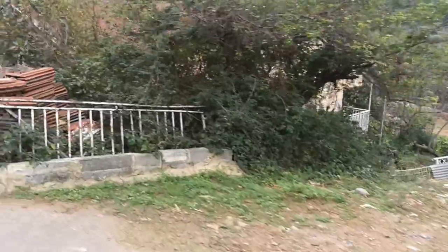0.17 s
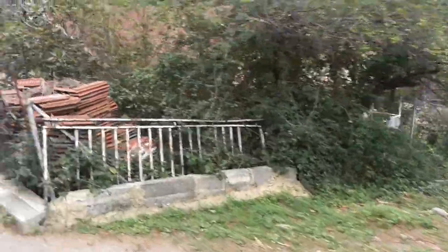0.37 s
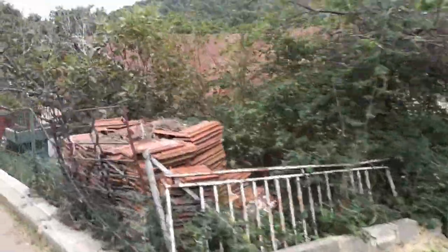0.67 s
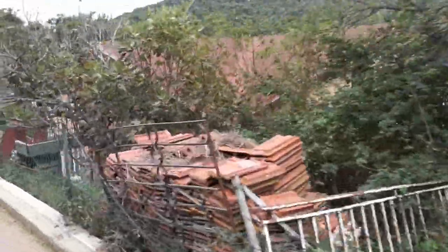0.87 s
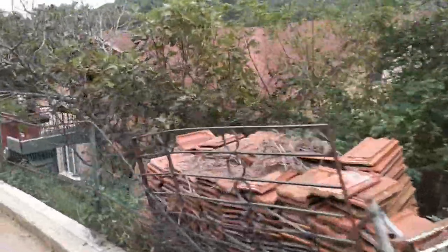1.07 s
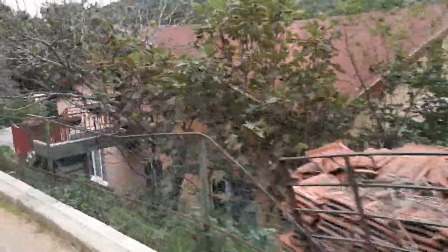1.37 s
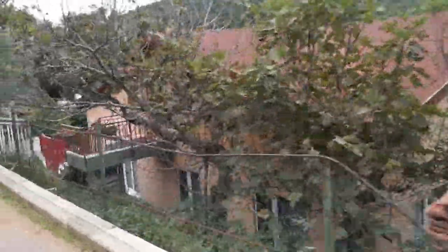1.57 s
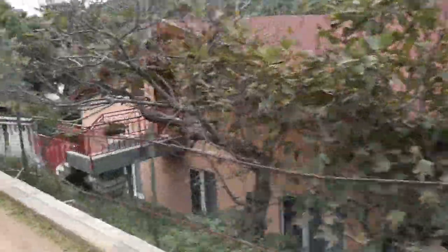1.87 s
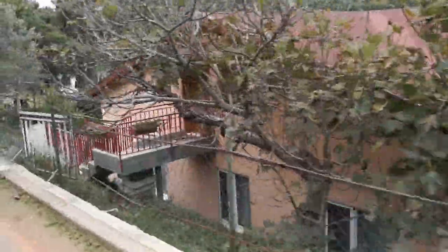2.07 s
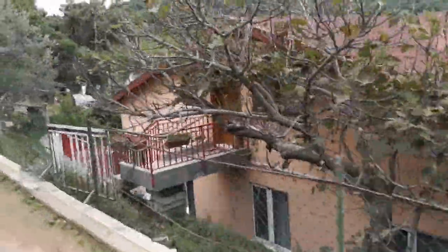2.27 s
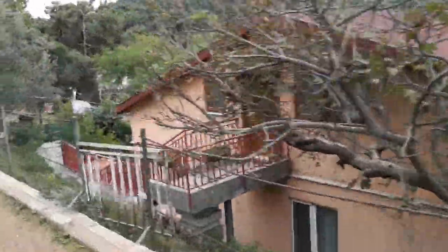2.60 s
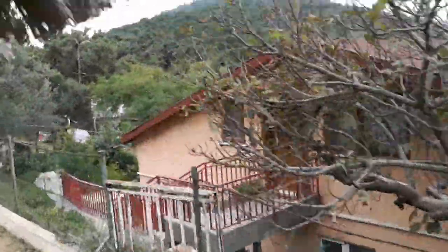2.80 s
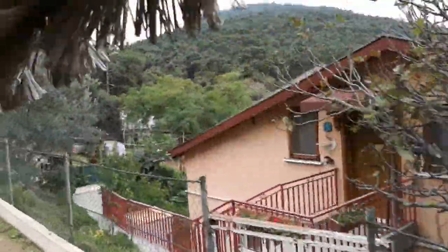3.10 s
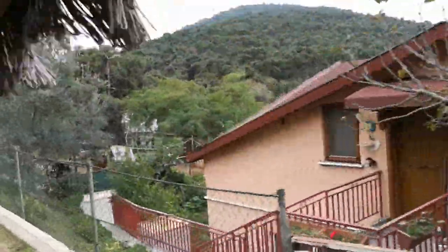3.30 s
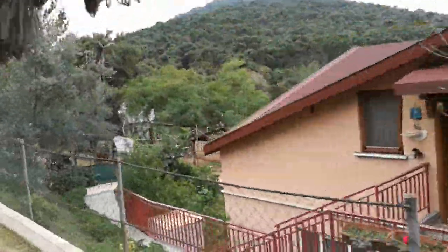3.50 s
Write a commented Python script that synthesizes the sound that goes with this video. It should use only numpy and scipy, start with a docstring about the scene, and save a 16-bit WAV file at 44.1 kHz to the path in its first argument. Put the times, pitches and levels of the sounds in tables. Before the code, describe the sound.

A horse-drawn cart rumbles along with irregular hoof knocks, wheel thuds and wind buffeting.

```python
"""Gusts buffet the microphone on board a horse-drawn cart trotting along a country lane.
Hooves and woodwork knock as hollow bodies ring, and jolts of the wheels give low thuds.
Shoes and fittings clack, iron scrapes over grit and the ironwork gives short squeaks.
Underneath, the wheels roll with a fluttering noise and a crackle of grit."""
import sys
import numpy as np
from scipy import signal
from scipy.fft import rfft, irfft
from scipy.io import wavfile
from scipy.ndimage import uniform_filter1d

SR = 44100
rng = np.random.default_rng(int(sys.argv[2]) if len(sys.argv) > 2 else 0)


def master(y):
    """Save y as 16-bit WAV."""
    cut = np.clip(np.atleast_2d(y).T, -1, 1)
    pcm = np.round(cut * 32767)  # scale
    wavfile.write(sys.argv[1], SR, pcm.astype(np.int16))


N = 160965
HZ = np.fft.rfftfreq(N, 1 / SR)
LEFT_LAG_S, HIT_SAMPLES = 0.000598, 8000


def amp(db):
    return 10 ** (np.asarray(db) / 20)


def pan(left_db):
    """Stereo gains, left_db louder on the left."""
    return amp([[left_db / 2], [-left_db / 2]])


def unit_rms(x):
    return x / np.sqrt(np.mean(x ** 2) + 1e-20)


def over_hz(points):
    hz, value = np.transpose(points)
    return np.interp(np.log(HZ + 1), np.log(hz + 1), value)


def over_time(points):
    return np.interp(np.arange(N) / SR, *np.transpose(points))


def colour(x, tone):
    """Filter by a spectrum; white noise keeps its rms."""
    return irfft(rfft(x) * unit_rms(amp(over_hz(tone))), N)


def resonate(x, hz, width_hz):
    return signal.lfilter(*signal.iirpeak(min(hz, 20000), hz / width_hz, SR), x)


def add(mix, start_s, sound):
    part = mix[:, round(start_s * SR):][:, :sound.shape[1]]
    part += sound[:, :part.shape[1]]


def bursts(per_s, spread_db, length_s):
    """Envelope of short bursts, random in time and size."""
    size = amp(spread_db * np.minimum(rng.exponential(1, N), 4)) * (rng.random(N) < per_s / SR)
    age = np.arange(2000) / SR / length_s
    return unit_rms(signal.oaconvolve(size, age * np.exp(-2 * age))[:N])


def impact(rise_s, t60_s, tail_db, tail_t60_s):
    """Envelope of a hit: quick rise, short crack, softer tail."""
    t = np.arange(HIT_SAMPLES) / SR
    return np.minimum(t / rise_s, 1) * (amp(-60 * t / t60_s) + amp(tail_db - 60 * t / tail_t60_s))


def mottle(x, spread_db):
    """Random louder and softer patches over time and frequency."""
    spectra = signal.stft(x, nperseg=512)[2]
    patches = uniform_filter1d(rng.standard_normal(spectra.shape[1:]), size=6, axis=0)
    patches = uniform_filter1d(patches, size=5, axis=1)
    return signal.istft(spectra * amp(spread_db * unit_rms(patches)), nperseg=512)[1][:, :N]


# Left-right likeness: freq_hz, correlation
PORT_COHERENCE = [(30, 0.95), (70, 0.99), (140, 0.94), (280, 0.98), (560, 0.6), (1100, 0.17), (2200, 0.033),
                  (5000, 0.056), (15000, 0.087)]
# Balance at lean 1: freq_hz, left_db
PORT_BALANCE = [(60, 0.5), (150, 0), (380, 0), (950, 1), (2380, -9), (5980, 16), (15000, -10.5)]

def port_noise(lean=0, lag_s=LEFT_LAG_S):
    """Noise at two nearby microphone ports: partly alike, the left one late."""
    left, other = rfft(rng.standard_normal((2, N)))
    alike = np.clip(over_hz(PORT_COHERENCE), 0, 1)
    tilt = amp(lean * over_hz(PORT_BALANCE) / 2)
    right = (alike * left + np.sqrt(1 - alike ** 2) * other) * np.exp(2j * np.pi * HZ * lag_s)
    return irfft(np.array([left * tilt, right / tilt]), N)


# Buffeting and cart-body drone: time_s, level_db
GUST_LEVELS = [(0.0, -31), (0.032, -39.5), (0.212, -33), (0.3, -41), (0.316, -34), (0.408, -37),
               (0.42, -32.5), (0.476, -19.5), (0.616, -27), (0.652, -37), (0.684, -26.5), (0.822, -21.5),
               (0.838, -30.5), (0.994, -26.5), (1.034, -17.5), (1.15, -26.5), (1.206, -34.5),
               (1.262, -34.5), (1.294, -37), (1.44, -42), (1.46, -46), (1.534, -22), (1.694, -33),
               (1.858, -18), (1.956, -28.5), (2.062, -44.5), (2.092, -29.5), (2.158, -37), (2.358, -18.5),
               (2.39, -27), (2.548, -24), (2.602, -17), (2.628, -22.5), (2.774, -32.5), (2.806, -23),
               (2.836, -32), (2.916, -18), (2.942, -23.5), (3.018, -16), (3.05, -30.5), (3.07, -26),
               (3.09, -25), (3.168, -26.5), (3.202, -18.5), (3.238, -31), (3.27, -18.5), (3.31, -31),
               (3.354, -17.5), (3.384, -25.5), (3.506, -20), (3.542, -24), (3.578, -25), (3.65, -29)]
DRONE_LEVELS = [(0.0, -54), (0.12, -33), (1.06, -35.5), (1.43, -43), (1.5, -31.5), (2.94, -27.5),
                (3.57, -29.5), (3.65, -53)]
# Their spectra and shared treble cut: freq_hz, gain_db
GUST_SPECTRUM = [(30, -6.5), (60, -4.5), (90, 1), (160, 0), (230, -4.5), (330, -11.5), (600, -39)]
GUST_UPPER_SPECTRUM = [(150, -9), (250, -6), (330, -2.5), (450, -4), (700, -12), (1100, -21), (1800, -26),
                       (3500, -53)]
DRONE_SPECTRUM = [(10, -3), (22, 12), (40, 10.5), (60, 9), (100, 7.5), (200, -3)]
TREBLE_CUT = [(6000, -140)]

def gusts_and_drone():
    """Lumpy pushes of air swell with each gust and jolt, over the cart body's smoother drone."""
    air = port_noise(lean=1, lag_s=0.00081)
    air *= unit_rms(1.5 + bursts(per_s=170, spread_db=1.5, length_s=.006))
    level_db = over_time(GUST_LEVELS)
    upper_db = -10 + 0.63 * (level_db + 26.5)  # strong gusts reach higher
    lower = colour(air, GUST_SPECTRUM + TREBLE_CUT)
    upper = colour(air, GUST_UPPER_SPECTRUM + TREBLE_CUT) * amp(upper_db)
    drone = colour(port_noise(), DRONE_SPECTRUM + TREBLE_CUT) * amp(over_time(DRONE_LEVELS))
    return (lower + upper) * amp(level_db) + drone


# Hoof and wood blows: start_s, level_db, pitch_hz, length_factor
KNOCK_HITS = [(0.032, -28.5, 1600, 2.3), (0.16, -29, 774, 0.97), (0.22, -28.5, 815, 4.2),
              (0.23, -27, 1600, 1.1), (0.502, -21, 1630, 0.84), (0.545, -26.5, 1470, 0.9),
              (0.749, -22.5, 1255, 1), (0.82, -34, 630, 0.97), (0.894, -30.5, 1070, 3.2),
              (0.997, -25.5, 1040, 1.3), (1.029, -17.5, 850, 0.97), (1.272, -18, 1204, 0.73),
              (1.272, -24, 2930, 0.62), (1.411, -26, 1040, 0.71), (1.474, -34, 1620, 0.18),
              (1.557, -26.5, 1310, 0.62), (1.723, -29.5, 1080, 0.36), (1.752, -30, 850, 0.4),
              (1.809, -18, 825, 1.2), (1.825, -14.5, 650, 1.1), (1.828, -36, 1650, 0.61),
              (2.088, -24.5, 1100, 0.85), (2.214, -24, 1180, 0.35), (2.24, -23, 1220, 0.81),
              (2.331, -23, 910, 1.1), (2.343, -14.5, 1160, 0.85), (2.367, -19, 1760, 0.77),
              (2.477, -26.5, 1040, 0.71), (2.604, -24.5, 810, 1.7), (2.878, -26, 1840, 2.2),
              (2.887, -16.5, 1510, 1.3), (2.998, -18.5, 650, 0.6), (3.012, -20, 880, 0.45),
              (3.147, -26, 810, 0.82), (3.208, -19.5, 895, 0.72), (3.273, -24.5, 785, 0.65),
              (3.281, -28.5, 1180, 0.5), (3.33, -26.5, 650, 0.89), (3.407, -15, 1160, 0.68),
              (3.493, -22.5, 664, 3.9), (3.542, -21.5, 660, 2.1), (3.584, -28, 840, 0.93)]
# Hollow-body modes: pitch_ratio, base_width_hz, gain_db
BODY_MODES = [(.35, 222, -7), (.62, 258, 8), (1.009, 240, 14), (1.5, 380, -0.5), (2.4, 590, -14)]
# Balance, deep knocks to the right: pitch_hz, left_db
KNOCK_BALANCE = [(600, -8), (1000, -14), (1800, 6)]

def knocks():
    """Hooves and woodwork: a tap and its rattle ring a hollow body, at a pitch set per blow."""
    out = np.zeros((2, N))
    noise = np.pad(port_noise(), ((0, 0), (0, HIT_SAMPLES)), "wrap")
    for start_s, level_db, pitch_hz, length in KNOCK_HITS:
        envelope = impact(rise_s=.0012, t60_s=.028 * length, tail_db=-14, tail_t60_s=.17 * length)
        hit = noise[:, round(start_s * SR):][:, :HIT_SAMPLES] * envelope
        hit[[0, 1], [20 + round(LEFT_LAG_S * SR), 20]] += 5.8  # first tap
        sharpness = np.clip(length, .3, 1)  # short blows ring wider
        ring = 0
        for ratio, base_width_hz, gain_db in BODY_MODES:
            mode_hz, width_hz = pitch_hz * ratio, base_width_hz / sharpness
            ring += amp(gain_db) * resonate(resonate(hit, mode_hz, 2 * width_hz), mode_hz, width_hz)
        ring = signal.lfilter(*signal.butter(2, min(3.5 * pitch_hz, 20000), fs=SR), ring)
        ring /= abs(ring).max(1, keepdims=True)
        left_db = np.interp(pitch_hz, *np.transpose(KNOCK_BALANCE))
        add(out, start_s, ring * amp(level_db + 1.67) * pan(left_db))
    return out


# Wheel jolts: start_s, level_db, pitch_hz
JOLTS = [(0.429, -8, 206), (0.479, -6.5, 166), (0.545, -12.5, 184), (0.603, -11.5, 177),
         (0.797, -14.5, 248), (0.998, -13.5, 272), (1.028, -8.5, 212), (1.527, -18, 167), (1.56, -16, 242),
         (1.751, -12.5, 173), (1.807, -13, 202), (1.82, -11.5, 151), (2.324, -15, 197), (2.59, -11, 191),
         (2.8, -11, 163), (2.906, -19, 149), (2.998, -8, 398), (3.008, -19, 150), (3.208, -10, 157),
         (3.264, -20, 151), (3.275, -14, 180), (3.323, -14.5, 221), (3.348, -22, 190), (3.464, -12.5, 196)]

def thuds(rise_s=.0011, edge_decay_s=.003):
    """Each jolt is a low push that dies in a cycle or two, with a hollow wooden edge."""
    out = np.zeros((2, N))
    t = np.arange(2000) / SR
    age_s = np.maximum(t - np.array([[LEFT_LAG_S], [0]]), 0)
    attack = np.minimum(age_s / rise_s, 1)
    for start_s, level_db, pitch_hz in JOLTS:
        cycles = pitch_hz * age_s
        push = -2 * np.sin(2 * np.pi * cycles) * np.exp(-cycles) * pan(-4.5)
        edge = resonate(rng.standard_normal(len(t)), hz=600, width_hz=600) * np.exp(-t / edge_decay_s)
        edge = np.interp(age_s, t, edge / abs(edge).max()) * amp(-13) * pan(-9)
        add(out, start_s, amp(level_db - 8) * attack * (push + edge))
    return out


# Shoe and fitting strikes: start_s, level_db, length_factor, top_db
CLACK_HITS = [(0.074, -33.5, 1.15, -9), (0.428, -33, 0.86, -16), (0.59, -44, 0.74, 0),
              (0.69, -39, 0.61, -14), (0.7366, -26, 2, -9), (1.019, -34, 0.75, -13), (1.055, -31, 0.88, -4),
              (1.1355, -36, 0.45, -8), (1.272, -35.5, 2.2, -32), (1.822, -32, 1, -12),
              (2.099, -26, 1.26, -6), (2.2184, -21, 1.16, -8), (2.302, -30, 0.52, -15),
              (2.35, -29, 0.66, -27), (2.5365, -36, 5.4, -29), (2.6058, -23.5, 1.23, -8.5),
              (2.6996, -30.5, 0.53, -15), (2.762, -37.5, 1.7, -10.5), (2.869, -32, 4.7, -14),
              (3.331, -33.5, 0.43, -33), (3.3882, -37.5, 5.1, -31), (3.4537, -26, 0.8, -7),
              (3.5813, -38, 1, -27)]
# Strike spectrum: freq_hz, gain_db
CLACK_SPECTRUM = [(880, 2), (1500, -1.5), (2640, -8), (5070, -12.5), (7690, -27.5), (8660, -27.5),
                  (11300, -35.5), (14100, -28), (16000, -39)]

def clacks(rise_s=.00013, crossover_hz=6450):
    """Sharp cracks of iron on stone and loose fittings; the top end dies sooner."""
    body, top = np.zeros((2, 2, N))
    for start_s, level_db, length, top_db in CLACK_HITS:
        t60_s, tail_t60_s = .065 * length, .15 * length
        body_hit = impact(rise_s, t60_s, -10.5, tail_t60_s)
        top_hit = impact(rise_s, .55 * t60_s, -21, tail_t60_s)
        add(body, start_s, body_hit * amp(level_db - 3) * pan(7.5))
        add(top, start_s, top_hit * amp(level_db + top_db + 16.5) * pan(.8))
    top_share = 1 / (1 + (crossover_hz / (HZ + 1)) ** 8)
    lows = rfft(port_noise() * body) * np.sqrt(1 - top_share)
    highs = rfft(port_noise() * top) * np.sqrt(top_share)
    return colour(irfft(lows + highs, N), [(500, -37)] + CLACK_SPECTRUM)


# Drags over grit: start_s, length_s, level_db, left_db
SCRAPE_STROKES = [(0.114, 0.079, -33.5, 2.5), (2.064, 0.14, -31.5, 0), (2.344, 0.029, -21.5, 6),
                  (2.86, 0.17, -25, 0), (3.138, 0.091, -36.5, -6)]
# Drag spectrum: freq_hz, gain_db
SCRAPE_SPECTRUM = [(350, -18), (600, -0.5), (846, -10.5), (1010, -2.5), (1570, -9.5), (1800, -5.5),
                   (2210, -12.5), (3300, -22.5), (16000, -44)]

def scrapes(ramp_s=.021, fade_db=-6):
    """Iron drags over grit in short, grainy strokes."""
    strokes = np.zeros((2, N))
    for start_s, length_s, level_db, left_db in SCRAPE_STROKES:
        t = np.arange(0, length_s, 1 / SR)
        ramps = np.minimum(np.minimum(t, length_s - t) / ramp_s, 1)
        add(strokes, start_s, ramps * amp(level_db + fade_db * t / length_s) * pan(left_db))
    grains = unit_rms(2.6 + bursts(per_s=150, spread_db=5.3, length_s=.0014))
    return colour(port_noise() * strokes * grains, [(250, -45)] + SCRAPE_SPECTRUM)


# Ironwork squeaks: start_s, length_s, pitch_hz, level_db, octave_db
IRON_SQUEAKS = [(0.541, 0.028, 3430, -49.5, -25), (0.882, 0.033, 2520, -44, -21),
                (0.864, 0.035, 6470, -57.5, -24), (1.215, 0.021, 2700, -48.5, -7),
                (1.24, 0.022, 2700, -45, -15), (1.385, 0.019, 6400, -59, -20),
                (1.625, 0.033, 2630, -47.5, -10), (1.783, 0.011, 2880, -43, -32),
                (1.874, 0.0094, 3730, -47, -17), (2.431, 0.042, 5420, -48.5, -12),
                (2.432, .009, 4640, -46, -12), (2.448, 0.018, 4700, -47.5, -12),
                (2.474, 0.017, 3290, -46, -23)]

def squeaks(waver_hz=80, roughness=.45):
    """The ironwork gives rough, wavering whistles with an octave above."""
    out = np.zeros((2, N))
    for start_s, length_s, pitch_hz, level_db, octave_db in IRON_SQUEAKS:
        t = np.arange(0, length_s, 1 / SR)
        waver, flicker = unit_rms(uniform_filter1d(rng.standard_normal((2, 3000)), size=90))[:, :len(t)]
        phase = 2 * np.pi * np.cumsum(pitch_hz + waver_hz * waver) / SR
        tone = (np.sin(phase) + amp(octave_db) * np.sin(2 * phase)) * (1 + roughness * flicker)
        arch = np.sqrt(abs(np.sin(np.pi * t / length_s)))
        add(out, start_s, amp(level_db) * arch * tone * np.array([[1.6], [.9]]))
    return out


# Wheels on the road: time_s, level_db
ROLL_LEVELS = [(0.0, -41), (0.64, -39.5), (1.11, -38.5), (1.3, -42), (1.51, -42), (1.69, -39.5),
               (2.12, -40), (2.27, -37), (2.89, -39), (3.09, -36.5), (3.24, -40.5), (3.53, -41),
               (3.65, -40)]
# Rolling spectrum and its bass end: freq_hz, gain_db
ROLL_SPECTRUM = [(180, -38), (300, 2), (354, -4.5), (433, -3), (737, -4), (1100, -3.5), (1610, -5),
                 (4160, -21), (5160, -24), (8500, -35), (15000, -39), (16000, -37)]
ROLL_BASS = [(150, -30)]

def wheels(flutter_db=1.23, grit_cutoff_hz=4020):
    """Fluttering rolling noise, with duller grit crunching under the tyres."""
    flutter = unit_rms(uniform_filter1d(uniform_filter1d(rng.standard_normal(N), size=1300), size=1300))
    grit = port_noise(lean=1) * amp(-8) * bursts(per_s=51, spread_db=-2.5, length_s=.0068)
    grit = irfft(rfft(grit) / (1 + (HZ / grit_cutoff_hz) ** 2), N)
    roll = mottle(port_noise(lean=.46), spread_db=2.5) * amp(flutter_db * flutter)
    return colour((roll + grit) * amp(over_time(ROLL_LEVELS)), ROLL_BASS + ROLL_SPECTRUM)


def scene():
    return gusts_and_drone() + wheels() + clacks() + scrapes() + knocks() + squeaks() + thuds()


def record(dry):
    """Steep low-pass at 16.3 kHz."""
    lowpass = signal.firwin(511, 16300, window=("kaiser", 9), fs=SR)
    return signal.oaconvolve(dry, lowpass[None], "same")


dry = scene()
out = record(dry)
master(out)
```